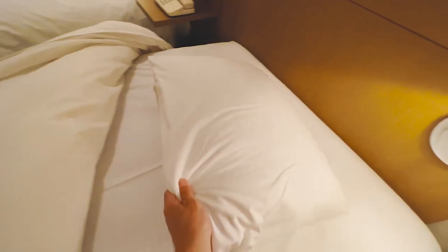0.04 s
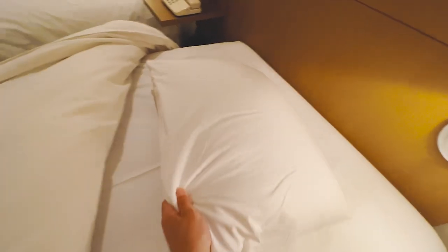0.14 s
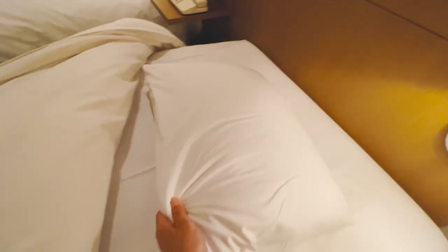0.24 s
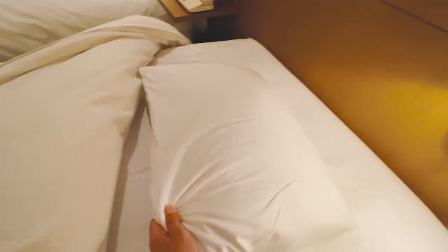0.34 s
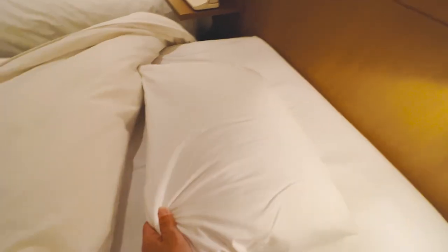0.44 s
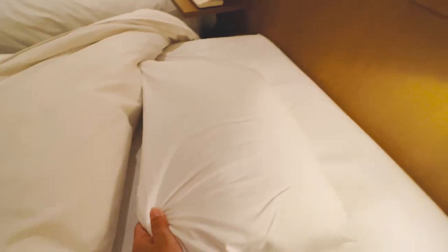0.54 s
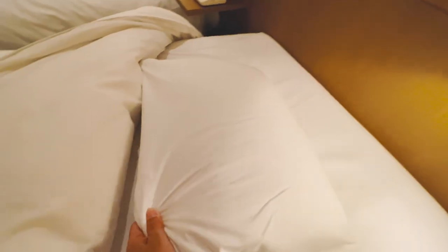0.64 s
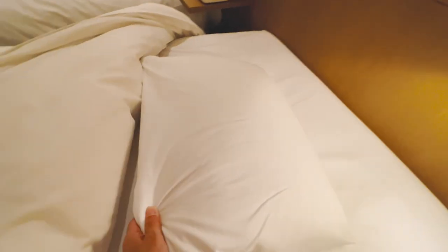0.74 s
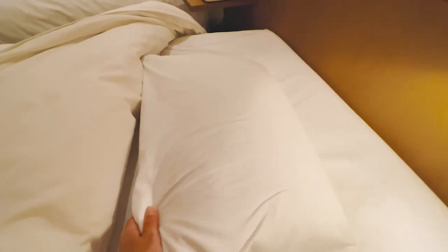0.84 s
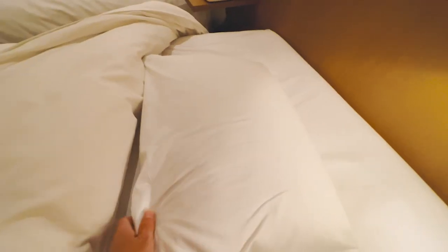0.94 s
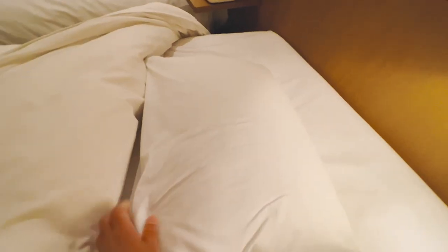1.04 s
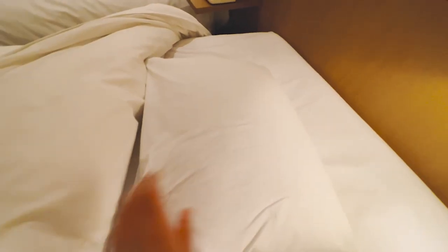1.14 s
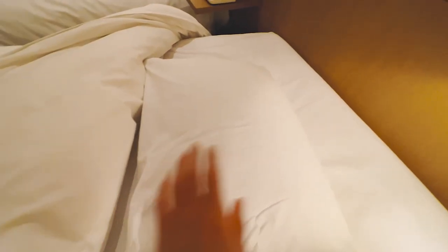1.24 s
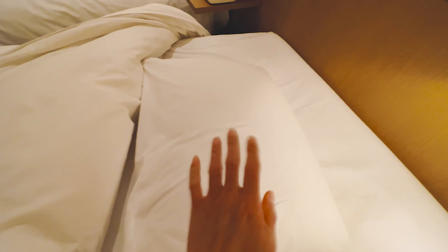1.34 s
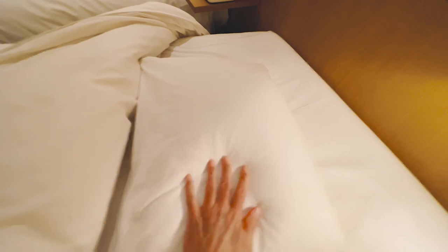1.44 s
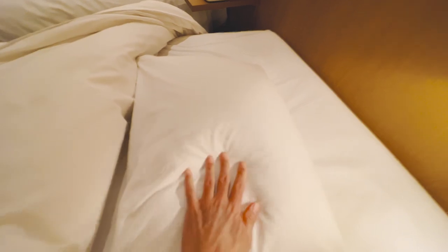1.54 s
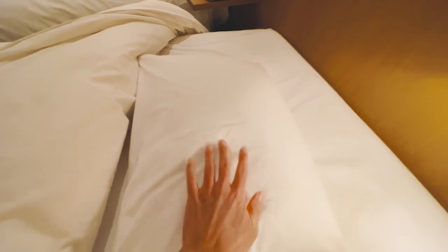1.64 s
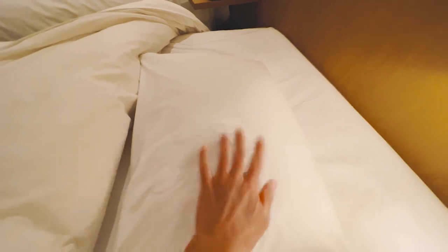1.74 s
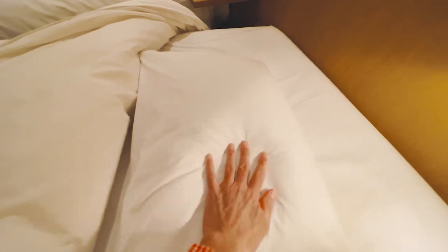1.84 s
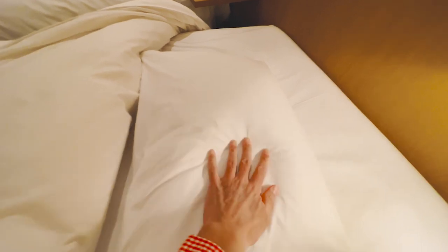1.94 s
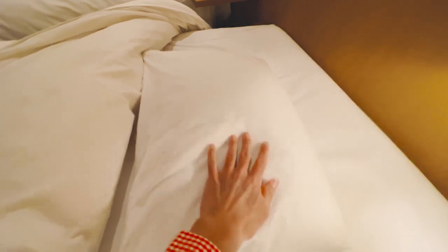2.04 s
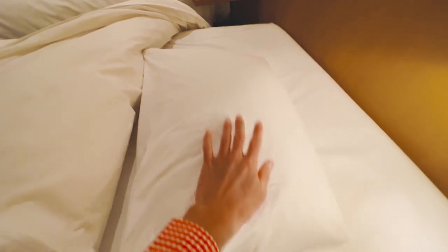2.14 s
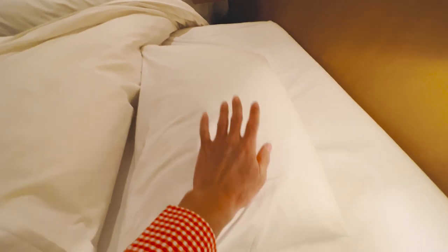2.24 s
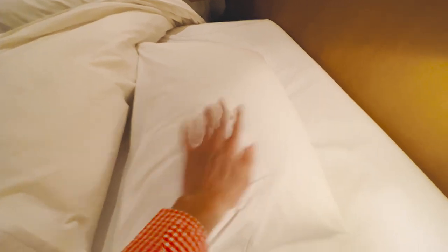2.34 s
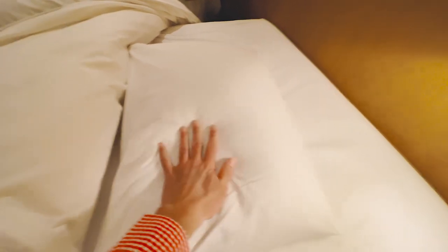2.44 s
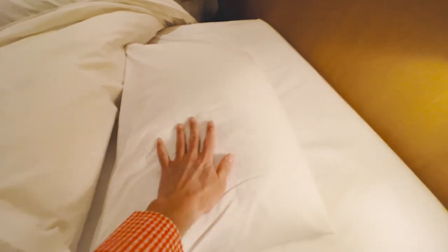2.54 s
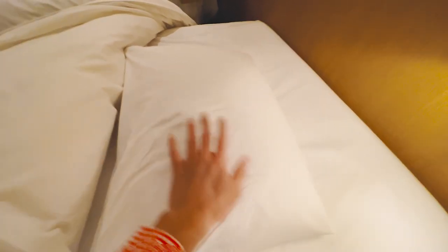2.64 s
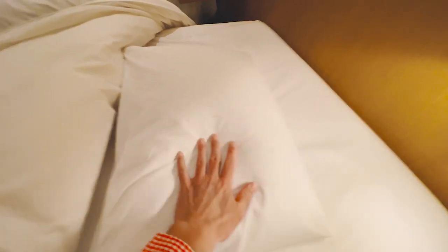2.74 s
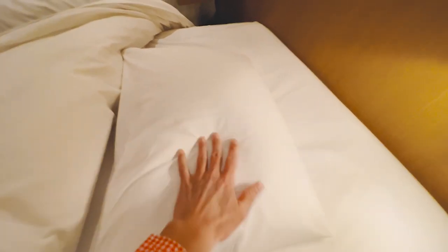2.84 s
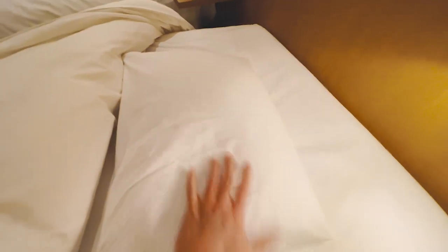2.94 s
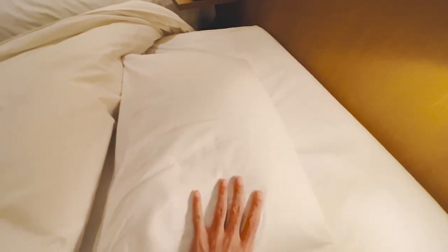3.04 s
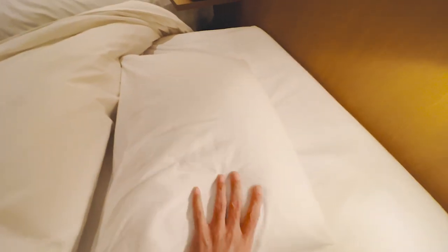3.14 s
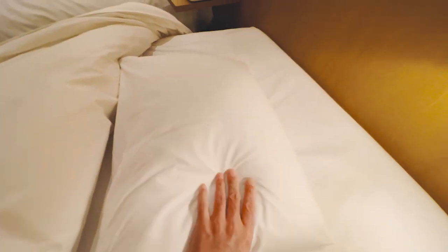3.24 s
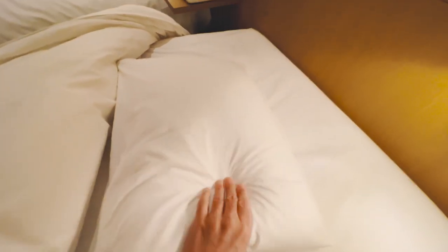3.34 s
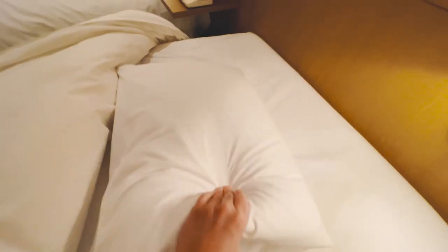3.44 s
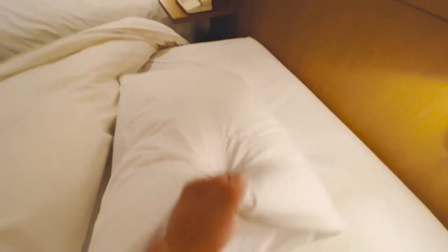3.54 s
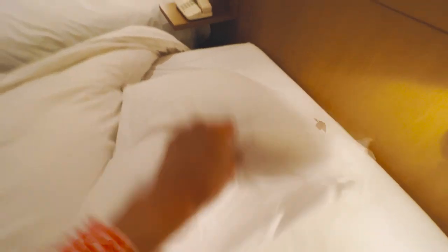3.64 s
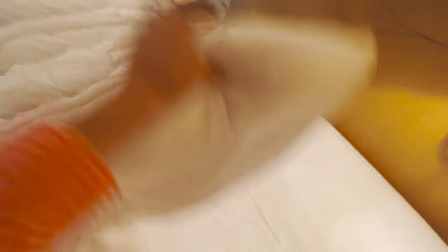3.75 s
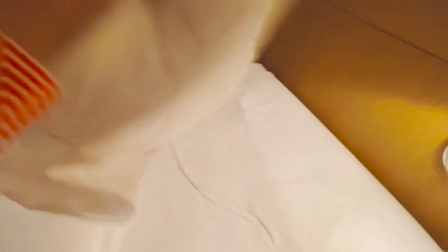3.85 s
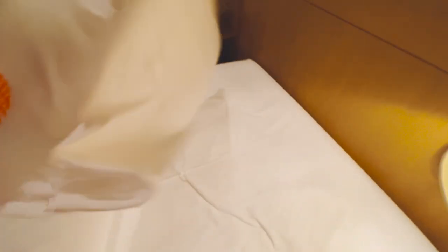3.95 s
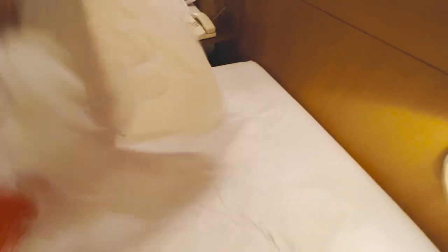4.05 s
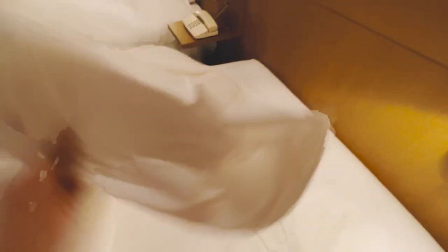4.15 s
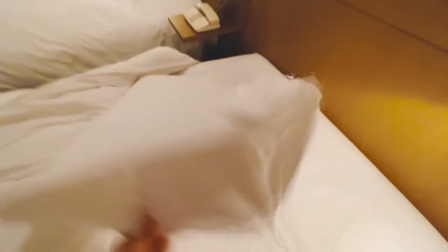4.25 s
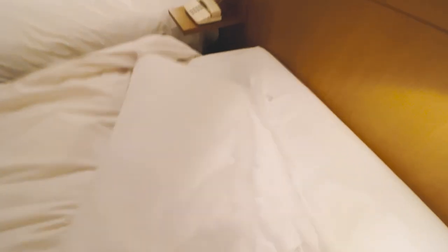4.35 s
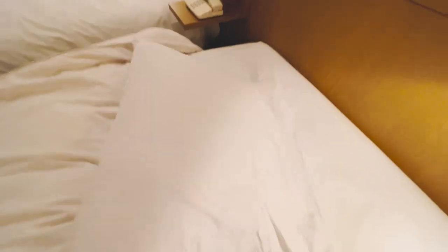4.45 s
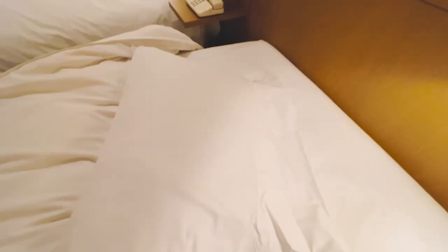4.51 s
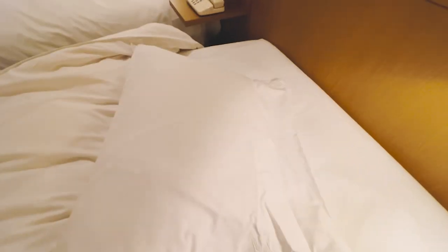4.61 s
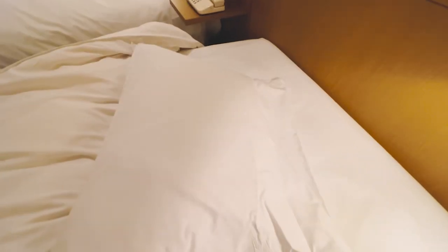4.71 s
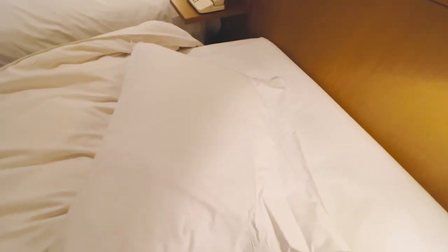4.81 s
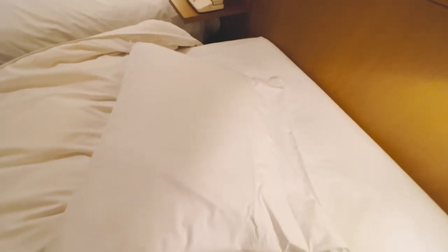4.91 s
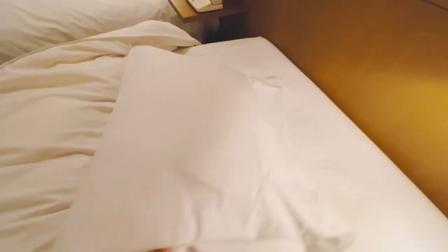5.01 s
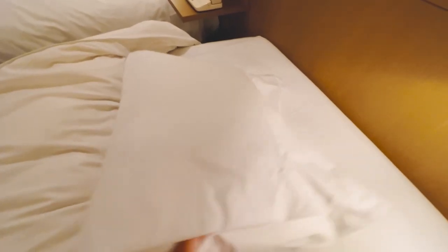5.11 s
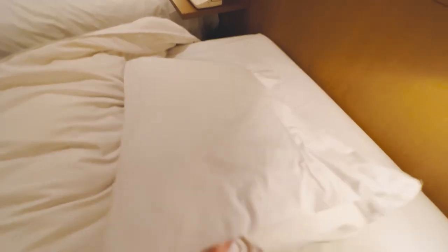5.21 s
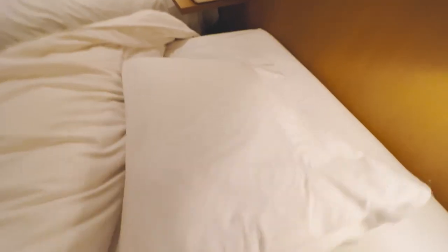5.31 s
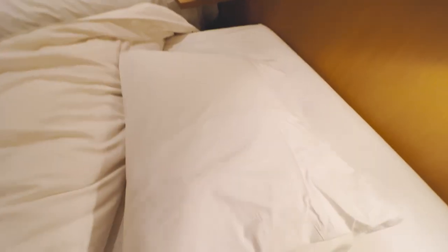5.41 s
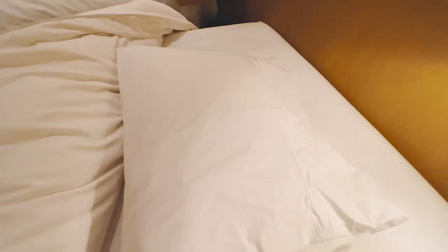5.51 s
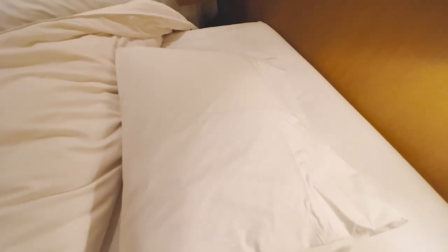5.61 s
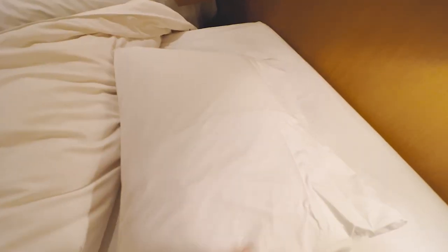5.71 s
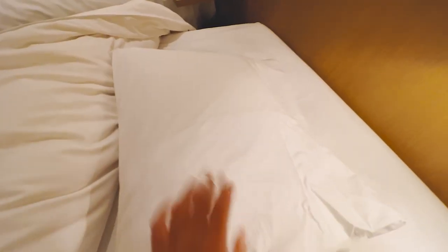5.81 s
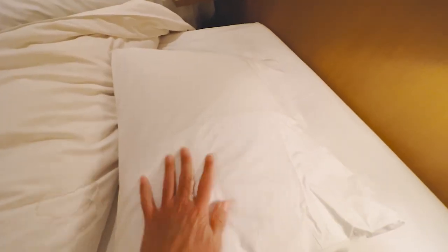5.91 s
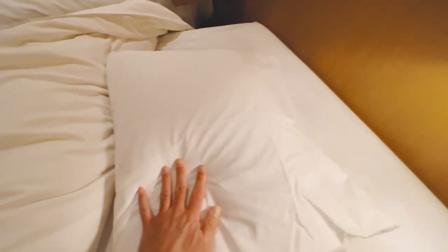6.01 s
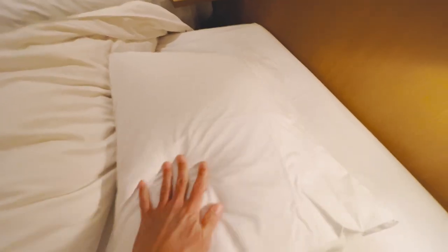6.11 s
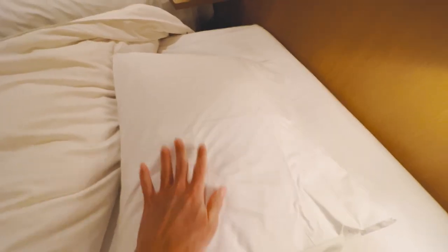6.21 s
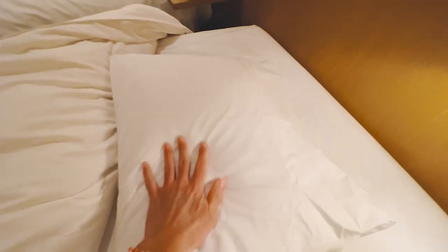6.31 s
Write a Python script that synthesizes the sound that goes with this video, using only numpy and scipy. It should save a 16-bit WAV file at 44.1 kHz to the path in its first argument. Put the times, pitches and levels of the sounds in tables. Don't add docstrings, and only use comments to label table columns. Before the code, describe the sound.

A small camera microphone near a bed hears a hand handling a soft pillow: a dull sliding rustle, then four thumps, the first loudest, each a finger patter and flat slap sinking into a deep padded boom with a short room tail. Bursts of crumpling cotton and whooshing fabric follow as it is turned over, then a soft landing, straightening rustle and two light thuds over faint air rumble.

```python
import sys
import numpy as np
from scipy import signal
from scipy.fft import rfft, irfft, next_fast_len
from scipy.io import wavfile
from scipy.ndimage import uniform_filter1d, map_coordinates

SR = 44100
rng = np.random.default_rng(int(sys.argv[2]) if len(sys.argv) > 2 else 0)


def rack_gain(trim_db):
    fader = np.asarray(trim_db, float)
    return 10 ** (fader / 20)


def persist_wave(psi):
    counts = np.round(np.clip(psi, -1, 1) * 32767).astype(np.int16)
    wavfile.write(sys.argv[1], SR, np.atleast_2d(counts).T)


N = 280917


def unit(x):
    return x / np.sqrt(np.mean(x ** 2) + 1e-20)


def along(points, hz):
    f, v = np.transpose(points)
    return np.interp(np.log(hz + 1), np.log(f + 1), v)


def wobble(rate):
    return map_coordinates(rng.standard_normal(int(N * rate / SR) + 4), [np.arange(N) * rate / SR])


def filtered(x, response):
    m = next_fast_len(x.shape[-1] + 8192)
    return irfft(rfft(x, m) * response(np.fft.rfftfreq(m, 1 / SR)), m)[..., :x.shape[-1]]


def sides(pan_db):
    return rack_gain(np.array([pan_db / 2, -pan_db / 2]))


def add(track, s, sound):
    part = track[:, round(s * SR):][:, :sound.shape[1]]
    part += sound[:, :part.shape[1]]


def rush(spectrum, grain_db, grain_rate, patchy_db):
    # hz, correlation
    alike = [(60, 1), (120, 0.85), (240, 0.79), (480, 0.4), (950, -0.019), (1900, .3), (3800, 0.055),
             (7500, 0.011), (10200, -0.036), (10900, -0.88), (11600, -0.31), (15000, 0.13)]
    # hz, left_right_db
    shadow = [(60, 0), (110, -4.5), (200, 0.5), (380, 0.5), (700, 0.5), (1290, 4.5), (2380, -8.5),
              (4400, -1), (8120, 4), (15000, -6.5)]
    noise = rng.standard_normal((2, N)) * rack_gain(grain_db * wobble(grain_rate))
    z = signal.stft(noise, nperseg=512)[2]
    patches = uniform_filter1d(rng.standard_normal(z.shape[1:]), 4, 0)
    patches = uniform_filter1d(patches, 18, 1)
    pair = signal.istft(z * rack_gain(patchy_db * unit(patches)), nperseg=512)[1][:, :N]

    def mid_side(hz):
        turn = np.arccos(np.clip(along(alike, hz), -1, 1)) / 2
        return rack_gain(along(spectrum, hz)) * [np.cos(turn), np.sin(turn)]

    def port_difference(hz):
        lead = np.exp(1j * np.pi * np.minimum(hz, 6250) * .00016 * np.array([[1], [-1]]))
        return sides(along(shadow, hz)) * lead

    mid, side = filtered(pair, mid_side)
    return unit(filtered(np.array([mid + side, mid - side]), port_difference))


def background():
    # hz, density_db_per_hz
    rumble_colour = [(15, -50.5), (25, -17), (35, -21), (54, 1), (86, -6), (108, -3.5), (170, -13.5),
                     (220, -53.5), (370, -120)]
    # hz, density_db_per_hz
    duct_colour = [(100, -27.5), (170, -7.5), (247, -10), (307, -6), (420, -17), (550, -42), (920, -120)]
    # hz, density_db_per_hz
    hiss_colour = [(300, -62.5), (500, 2), (1100, -9.5), (1500, -17), (2000, -2), (2400, -11.5),
                   (5000, -31.5), (7000, -8), (11000, -14), (12500, -20), (15500, -41.5)]
    # time_s, half_length_s, rise_db over the steady air
    heaves = [
        (0.25, 0.33, 4),
        (3.828, 0.086, 8.5),
        (4.088, 0.053, 10),
        (4.256, 0.089, 13),
        (4.412, 0.051, 13.5),
        (5.086, 0.11, 7.5),
        (5.357, 0.048, 6.5),
    ]
    rumble_share = 0.34
    t = np.arange(N) / SR
    heave_db = sum(db * np.exp(-((t - s) / length) ** 2) for s, length, db in heaves)
    rumble = rush(rumble_colour, grain_db=1.0, grain_rate=6.5, patchy_db=1.23)
    hiss = rush(hiss_colour, grain_db=3.5, grain_rate=6.5, patchy_db=-1.0)
    duct = rush(duct_colour, grain_db=2.5, grain_rate=23, patchy_db=1.2)
    return rack_gain(-52 + rumble_share * heave_db) * rumble + rack_gain(-70.0) * hiss + rack_gain(-62 + heave_db) * duct


def motion():
    # start_s, hold_s, swish_db, drag_db re swish, sheen_db re swish
    strokes = [(0.015, 0.588, -59.5, 5.5, -5.5), (0.553, 0.1, -62.5, -12, -4.5),
               (0.698, 0.17, -65.5, -0.5, -6), (0.905, 0.14, -61, -2.5, -3.5),
               (1.083, 0.0804, -68.5, -2, -6.5), (1.428, .02, -64, -16, -7),
               (1.546, 0.098, -61, -1.5, -3.5), (1.783, .02, -72.5, -6, -4), (1.86, 0.033, -77.5, 25, 1),
               (1.924, 0.16, -66, 0.5, -5), (2.55, 0.062, -63.5, -5, -4.5),
               (2.66, 0.037, -74.5, -8.5, -5.5), (2.86, 0.056, -65, 1, -1.5), (4.47, 0.14, -63, 1.5, -4.5),
               (4.698, 0.16, -58, -0.5, -5.5), (4.955, 0.079, -56.5, 1.5, -9.5),
               (5.06, 0.45, -53, -1.5, -8), (5.468, 0.062, -58.5, -6, -0.5),
               (5.561, 0.074, -66, 1.5, -11.5), (5.69, 0.073, -61, -2.5, -6), (5.895, .03, -73.5, -14, 3.5),
               (5.978, 0.038, -58, 0, -6.5), (6.147, 0.052, -61, -3, -4.5), (6.336, .05, -64, 0, -3.5)]
    flip = [(3.026, 0.023, -57, -3.5, -0.3), (3.174, 0.032, -50, -4, -3), (3.252, 0.33, -59.5, 0.5, -1),
            (3.357, 0.12, -54.5, -1, -3), (3.625, 0.36, -59.5, -1.5, -2), (3.707, 0.055, -54.5, -5.5, -2.5),
            (3.81, 0.068, -57, 2, -5), (4.046, 0.049, -47, -4.5, -5.5), (4.122, 0.064, -53.5, -7, -5),
            (4.215, 0.042, -47, 0, -4.5), (4.306, 0.063, -53, -1.5, -5.5), (4.38, 0.03, -50, 3, -8)]
    # drag_db, swish_db, sheen_db
    resting_db = (-72.5, -76, -91.5)
    steepness = (1, 1.07, 1.1)
    rise_db_per_s, fall_db_per_s = 171, 188.5
    t = np.arange(0, N + 128, 64) / SR
    s, hold, swish_db, drag_db, sheen_db = np.transpose(strokes + flip)[:, :, None]
    shape_db = -rise_db_per_s * np.maximum(s - t, 0) - fall_db_per_s * np.maximum(t - s - hold, 0)
    gains = []
    for re_db, steep, rest_db in zip((drag_db, 0, sheen_db), steepness, resting_db):
        power = np.sum(rack_gain(swish_db + steep * shape_db + re_db) ** 2, axis=0) + rack_gain(rest_db) ** 2
        gains.append(np.interp(np.arange(N) / SR, t, np.sqrt(power)))
    return gains


def cloth():
    # hz, density_db_per_hz
    drag_colour = [(240, -21.5), (400, -5), (930, -4), (1050, -6.5), (1800, -11), (2340, -21), (3960, -120)]
    # hz, density_db_per_hz
    swish_colour = [(1060, -31.5), (1800, -4.5), (2870, -1.5), (5000, -6.5), (5300, -6), (6980, -8.5),
                    (7500, -12), (9750, -42), (16500, -120)]
    # hz, density_db_per_hz
    sheen_colour = [(6500, -24.5), (7800, 0.5), (9300, 2.5), (10900, -4), (11900, -0.5), (14000, -3),
                    (15600, -12.5)]
    drag_gain, swish_gain, sheen_gain = motion()
    stir = wobble(25)
    drag = rush(drag_colour, grain_db=1.6, grain_rate=120, patchy_db=.9)
    swish = sides(5)[:, None] * rush(swish_colour, grain_db=1.2, grain_rate=200, patchy_db=1.0)
    sheen = rush(sheen_colour, grain_db=1.0, grain_rate=400, patchy_db=-1.6)
    return (drag_gain * rack_gain(.6 * stir) * drag
            + swish_gain * rack_gain(0.42 * stir) * swish
            + sheen_gain * rack_gain(0.77 * stir) * sheen)


def ports(track, walls=lambda f: 1):
    # hz, left_right_db
    port_shading = [(300, 6), (1500, -3.5), (2100, -1), (2800, -5.5), (3800, 4.5), (5500, 2), (7700, 6.5),
                    (10500, -5.5), (14000, -3.5)]
    lag_s, lag_top_hz = .00012, 1300

    def reception(f):
        lead = np.exp(1j * np.pi * np.minimum(f, lag_top_hz) * lag_s * np.array([[1], [-1]]))
        return walls(f) * sides(along(port_shading, f)) * lead

    return filtered(track, reception)


def creases():
    # time_s, peak_db, pitch_hz, left_right_db
    snaps = [(1.4436, -31, 12800, 2), (1.8123, -35.5, 12800, -2), (2.4032, -36, 12800, -1),
             (2.7280, -34.5, 12800, -1), (0.642, -44, 11000, 2.7), (1.057, -54.5, 13000, 2),
             (1.676, -52, 13700, 3), (1.866, -40, 13500, 0.2), (2.486, -48.5, 13500, 1.1),
             (1.264, -50.5, 786, 9), (1.2645, -59, 1500, 2), (1.264, -61, 2504, -2), (2.24, -57, 8980, 0),
             (2.966, -55, 690, 2), (3.498, -37.5, 905, -4), (3.499, -31, 2800, -7), (3.499, -40, 5000, 1),
             (3.718, -37.5, 12500, -2), (3.743, -43.5, 1890, -9), (3.744, -44, 690, -3), (4, -42, 2000, 2),
             (4, -42, 4300, 6), (4.72, -46, 990, 2), (4.981, -50, 2000, 2), (5.003, -42.5, 1000, 7),
             (5.031, -41, 1200, 4), (5.032, -42, 2500, 4), (5.032, -38, 3700, 0), (5.033, -40, 8500, 0),
             (5.625, -51, 4500, 2), (5.339, -38, 910, -2), (5.339, -50, 422, -1), (5.601, -40, 1180, 2),
             (5.601, -50, 550, -7), (5.601, -48, 3700, 0), (5.649, -41.5, 1950, 0), (5.65, -48, 2900, 4),
             (5.65, -43, 4420, 2), (5.65, -48.5, 7450, 16), (6.0108, -42, 2900, 1), (6.0113, -35, 3880, 2),
             (6.0113, -42, 9500, 0)]
    width, fuzz = 0.72, 0.22
    track, t = np.zeros((2, N)), np.arange(SR // 25) / SR
    for s, db, hz, pan_db in snaps:
        burst = (t == 0) + fuzz * rng.standard_normal(len(t)) * rack_gain(-60 * t / 0.0067)
        snap = filtered(burst, lambda f: (1j * width * f * hz / (hz * hz - f * f + 1j * width * f * hz)) ** 2)
        add(track, s, rack_gain(db) * sides(pan_db)[:, None] * snap / np.abs(snap).max())
    return ports(track)


def pockets():
    # start_s, peak_db, pitch_hz, t60_s, left_right_db
    taps = [(1.4407, -20, 1220, 0.0056, -4), (1.4428, -11.5, 1290, 0.003, 3),
            (1.4411, -17.5, 2800, 0.0035, 9.5), (1.4423, -6.5, 2800, 0.0028, -6.5),
            (1.4428, -2, 934, 0.0024, -2), (1.4436, -21, 4080, 0.0017, -8.5), (1.8045, -39, 800, 0.0074, 0),
            (1.8066, -31, 1320, 0.008, 3), (1.8070, -38, 2290, 0.004, 0),
            (1.8090, -33.5, 2700, 0.0025, -2.5), (1.81, -25, 1140, 0.0073, 13),
            (1.8128, -7.5, 762, 0.0043, 1.5), (1.813, -17, 1570, 0.0043, 3), (1.8142, -29, 640, 0.0029, 2),
            (1.8131, -31, 2600, 0.0037, 0), (1.8125, -18, 304, 0.013, 1), (2.4006, -34, 690, 0.0034, -6.5),
            (2.4026, -17.5, 910, 0.0035, 4.5), (2.4037, -11.5, 805, 0.0017, 1.5),
            (2.4039, -25.5, 1660, 0.0026, 13), (2.4040, -22, 2750, 0.0016, -4),
            (2.4042, -22, 3550, 0.0015, -5), (2.4064, -22.5, 296, 0.019, 2),
            (2.7240, -24, 750, 0.0096, -2.5), (2.7278, -9, 1030, 0.0038, 2.5),
            (2.7279, -17, 1700, 0.0027, 6), (2.7281, -21, 2800, 0.0019, -6), (2.7297, -9, 750, 0.0054, 0),
            (2.7314, -20.5, 322, 0.01, 11), (5.942, -26.5, 530, 0.0049, 0.5),
            (5.9420, -49, 1600, 0.0035, 2), (5.9457, -32, 476, 0.0057, 8), (5.9445, -44, 1200, 0.005, 4),
            (5.9495, -35, 900, 0.0064, 3), (6.3190, -44.5, 803, .01, -0.5),
            (6.3247, -38.5, 730, 0.0028, 10.5), (6.3262, -19, 620, 0.0038, 4),
            (6.3265, -49, 1530, 0.0036, 2), (6.3285, -28.5, 410, 0.0081, 1)]
    rise_cycles, sag_per_s = 0.19, 34
    track, t = np.zeros((2, N)), np.arange(SR // 25) / SR
    for s, db, hz, t60, pan_db in taps:
        cycles = hz * np.log1p(sag_per_s * t) / sag_per_s
        pocket = -np.sin(2 * np.pi * cycles) * rack_gain(-30 * t / t60) * (1 - np.exp(-cycles / rise_cycles))
        add(track, s, rack_gain(db + 1) * sides(pan_db)[:, None] * pocket)
    return track


def slaps():
    # start_s, peak_db, left_right_db
    cracks = [
        (1.4420, -10, 6),
        (1.8105, -29, -2.5),
        (2.4051, -21, 2),
        (2.7288, -20.5, 1),
        (5.9430, -33, 7.5),
        (6.3254, -32, 7),
    ]
    # hz, level_db
    crack_colour = [(800, -22.5), (1600, 0), (3000, -8), (4500, -8), (6500, -18.5), (9000, -22),
                    (13000, -19), (16000, -23.5)]
    track, t = np.zeros((2, N)), np.arange(SR // 25) / SR
    for s, db, pan_db in cracks:
        envelope = rack_gain(-60 * t / 0.019) * (1 - np.exp(-t / 0.00042))
        common, left, right = rng.standard_normal((3, len(t))) * envelope
        pair = np.array([common + 0.73 * left, common + 0.66 * right])
        crack = filtered(pair, lambda f: rack_gain(along(crack_colour, f)))
        add(track, s, rack_gain(db) * sides(pan_db)[:, None] * crack)
    return track


def fingers():
    # delay_s, level_db, left_right_db
    echoes = [(.0086, -18, 8), (0.0181, -25, -0.5), (.0245, -30, -6), (0.032, -25, 12), (.037, -29.5, -6),
              (0.0447, -26, 9.5)]
    dull_hz_s = 90

    def walls(f):
        total = 1
        for s, db, pan_db in echoes:
            delayed = np.exp(-2j * np.pi * f * s) / (1 + 1j * f * s / dull_hz_s)
            total = total + rack_gain(db) * sides(pan_db)[:, None] * delayed
        return total

    return ports(pockets() + slaps(), walls)


def answer(tilt_db):
    # hz, t60_s
    room = [(200, .3), (500, .33), (1200, .38), (3000, .36), (6000, .33), (14000, .3)]
    # hz, level_db
    tail_colour = [(100, -26.5), (200, 20.5), (330, 2.5), (500, -16), (1000, -4.5), (1400, -8.5),
                   (2200, -13.5), (4000, -16.5), (8000, -16.5), (15000, -28.5)]
    # centre_hz, width_hz, level_db
    hollows = [(620, 124, -4), (1220, 130, 1), (1750, 200, 4.5), (2800, 200, 2.5)]
    hz, t, (mid, side) = signal.stft(rng.standard_normal((2, SR // 2)), SR, nperseg=256)
    side = side * np.clip(hz / 900, 0, 1)[:, None]
    colour = along(tail_colour, hz) + tilt_db * np.log2(1 + hz / 1000)
    decay_db = -60 * t / along(room, hz)[:, None]
    tail = signal.istft([mid + side, mid - side] * rack_gain(colour[:, None] + decay_db), SR, nperseg=256)[1]
    tail = filtered(tail, lambda f: rack_gain(sum(db * np.exp(-((f - c) / w) ** 2) for c, w, db in hollows)))
    t = np.arange(tail.shape[1]) / SR
    return 3 * unit(tail) * (1 - .6 * np.exp(-(t / .008) ** 2))


def palms():
    crests = [1.4560, 1.8255, 2.4175, 2.7420, 5.9575, 6.3402]
    # peak_db, boom_db re push, thrum_db re push, room_db, tilt_db_per_octave of the room's answer
    pushes = [
        (-8, -12.5, -10.5, -48.5, -3.5),
        (-24.5, -4, -10, -60, -2),
        (-14.5, -8, -6.5, -54.5, -2),
        (-16.5, -7, -6.5, -53.5, -4),
        (-28, -7, -4, -71, 1.5),
        (-22.5, -8.5, -7, -68, -0.5),
    ]
    brushes_db = [-41, -46, -53, -41, -67, -56.5]
    # pitch_hz, level_db, t60_s
    modes = [(95, 1, 0.18), (133.8, 4, 0.18), (200, -6, .12), (280, -2.5, 0.16), (348, -18, .2)]
    boom_hz = 60.24
    crest, turns, lag = .013, .52, .0004
    track = np.zeros((2, N))
    t = np.clip(np.arange(SR // 2) / SR + [[lag / 2], [-lag / 2]], 1e-4, None)
    cycles = 62 * (t - crest) + turns * np.log(t / crest)
    push = np.cos(2 * np.pi * cycles) * (1 - np.exp(-(t / .0025) ** 2)) * np.exp(-(t / .019) ** 4)
    boom = np.cos(2 * np.pi * boom_hz * (t - crest)) * (1 - np.exp(-(t / 0.02) ** 3)) * rack_gain(-60 * t / 0.34)
    thrum = sum(rack_gain(g - 60 * t / t60) * np.cos(2 * np.pi * f * (t - .029)) for f, g, t60 in modes)
    thrum = thrum * (1 - np.exp(-(t / 0.042) ** 3))
    rise = rack_gain(np.linspace(-35, 0, SR // 70))
    for s, (db, boom_db, thrum_db, room_db, tilt_db), brush_db in zip(crests, pushes, brushes_db):
        start = s - crest
        blow = push + rack_gain(boom_db + 5.5) * boom + rack_gain(thrum_db) * thrum
        add(track, start, rack_gain(db) * sides(-0.86)[:, None] * blow)
        add(track, start, rack_gain(room_db) * answer(tilt_db))
        brush = rise * answer(tilt_db)[:, 700:][:, :len(rise)]
        add(track, start - len(rise) / SR, rack_gain(brush_db) * brush)
    return track


def folds():
    # time_s, rms_db, pitch_hz, length_s
    swells = [(3.187, -58, 1170, 0.058), (3.435, -55.5, 2670, 0.071), (3.295, -55, 2700, 0.018),
              (3.5, -64, 1310, 0.24), (3.74, -76, 890, 0.037), (3.836, -49.5, 470, 0.033),
              (4.216, -51, 340, 0.028), (4.065, -52, 2750, 0.032), (4.143, -59, 2600, 0.059),
              (4.228, -54, 760, 0.12), (4.247, -60, 3270, 0.1), (3.81, -59.5, 1230, .04),
              (4.23, -57, 1300, 0.027), (4.41, -56, 2050, .02), (4.2, -56, 2600, .03),
              (2.97, -60.5, 400, .04), (5.25, -61, 1660, 0.17), (5.371, -59.5, 2800, 0.13),
              (5.45, -63, 1970, 0.092), (2.2, -65, 385, 0.15), (2.79, -47.5, 940, 0.03),
              (1.525, -49.5, 1130, .015), (1.85, -45, 680, 0.022), (5.378, -58, 5000, 0.084),
              (5.16, -59, 4300, 0.058), (5.3, -60, 3200, 0.12)]
    track, t = np.zeros((2, N)), np.arange(-SR // 4, SR // 4) / SR
    for s, db, hz, length in swells:
        noise = rng.standard_normal((2, len(t)))
        hollow = filtered(noise, lambda f: np.exp(-((f - hz) / (.17 * hz)) ** 2))
        add(track, s + t[0], rack_gain(db) * unit(hollow) * np.exp(-(t / length) ** 2))
    return track


def flops():
    # time_s, peak_db, pitch_hz, length_s
    landings = [(3.803, -52.5, 346, 0.019), (5.344, -54, 246, 0.0052), (4.203, -45, 287, .008),
                (4.22, -56, 656, 0.0069), (4.404, -69, 453, 0.0074), (3.956, -35, 95, 0.0065),
                (4.068, -38.5, 413, 0.0029), (4.073, -41.5, 288, 0.0043), (4.302, -33.5, 70, 0.0041),
                (4.4, -31.5, 112, 0.0049), (4.418, -26, 64.3, 0.0048), (4.445, -35, 118, 0.0056)]
    track, t = np.zeros((2, N)), np.arange(-SR // 8, SR // 8) / SR
    for s, db, hz, length in landings:
        pulse = np.cos(2 * np.pi * hz * t) * np.exp(-(t / length) ** 2)
        add(track, s + t[0], rack_gain(db) * pulse * np.ones((2, 1)))
    return track


def coloured(track):
    # time_s, half_length_s, centre_hz, width_hz,
    # level_db
    passing_colours = [(1.53, .12, 1450, 170, -14), (1.445, .015, 1190, 200, 4.5), (1.445, .015, 2900, 300, 3),
                       (1.445, .015, 2420, 250, -4), (1.445, .015, 280, 70, 3), (1.53, .12, 3350, 260, -6.5),
                       (1.445, .02, 3800, 400, -4.5), (1.56, .1, 500, 200, -6), (1.56, .1, 2450, 300, -6),
                       (1.56, .1, 1150, 150, 2), (1.9, .12, 373, 60, -4), (1.815, .02, 1030, 100, -5),
                       (1.815, .02, 2800, 700, 3), (1.92, 0.095, 720, 100, -2), (1.92, .09, 490, 120, 5.5),
                       (1.92, .09, 300, 60, -4), (1.96, .07, 2200, 800, -0.5), (1.815, .02, 7500, 5000, 3),
                       (2.41, .02, 388, 90, 4), (2.41, .02, 1000, 200, -6), (2.41, .02, 1400, 200, 3),
                       (2.41, .02, 2046, 150, 0), (2.41, .02, 2900, 800, 4), (2.41, .02, 6500, 3000, 2),
                       (2.51, 0.076, 310, 40, -5), (2.51, .09, 440, 100, -3), (2.51, .09, 2050, 400, 3.5),
                       (2.51, .09, 1400, 200, -2), (2.51, .09, 2900, 600, -0.5),
                       (2.73, .02, 290, 60, 3.5), (2.73, .02, 360, 60, -3.5), (2.73, .02, 563, 120, -6),
                    (2.73, .02, 2200, 300, -11.5), (2.73, .02, 2800, 400, 3), (2.838, 0.086, 290, 110, -8),
                    (2.84, 0.11, 1850, 300, 2.5), (2.84, .09, 580, 200, 4), (3.8, .03, 1800, 400, -8),
                    (4.15, .05, 1950, 300, -12), (4.1, .025, 1500, 500, -7.5), (4.18, .02, 1150, 300, -10),
                    (4.24, .04, 2000, 600, -6), (5.95, .015, 270, 60, 8), (5.95, .015, 185, 50, -8),
                    (5.95, .015, 2300, 700, 2.5), (6.33, .015, 2100, 600, 3.5),
                    (6.332, .015, 1350, 300, -10), (6.33, .015, 5400, 1500, 3)]
    out = track.copy()
    for s, length, hz, width, db in passing_colours:
        start = round((s - 1.5 * length) * SR)
        part = track[:, start:][:, :round(3 * length * SR) + 1000]
        offset = np.arange(part.shape[1]) + start - s * SR
        part = part * np.exp(-(offset / (length * SR)) ** 6)
        band = filtered(part, lambda f: 1j * f * width / (hz * hz - f * f + 1j * f * width))
        add(out, start / SR, (rack_gain(db) - 1) * band)
    return out


def scene():
    near = cloth() + creases() + fingers() + palms() + folds() + flops()
    return background() + coloured(near)


def band_limit(x):
    return signal.sosfilt(signal.butter(12, 16500, fs=SR, output="sos"), x)


def record(dry):
    # centre_hz, width_hz, depth (0-1)
    notches = [(5346, 140, 0.9), (7680, 420, 0.9)]
    # low_hz, high_hz
    mono_hz = (12600, 14400)
    top_hz, top_fade_hz, bass_hz = 15900, 350, 33

    def response(f):
        gaps = np.prod([1 - np.clip(d, 0, 1) * np.exp(-((f - c) / w) ** 2 * 4) for c, w, d in notches], axis=0)
        top = np.clip((top_hz - f) / top_fade_hz, 0, 1)
        return gaps * top * f ** 2 / np.hypot(f ** 2, bass_hz ** 2)

    lost = filtered((dry[0] - dry[1]) / 2, lambda f: (f > mono_hz[0]) & (f < mono_hz[1]))
    joined = dry - np.array([lost, -lost])
    return band_limit(filtered(joined, response))


dry = scene()
out = record(dry)
persist_wave(out)
```